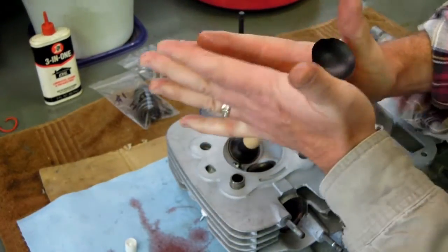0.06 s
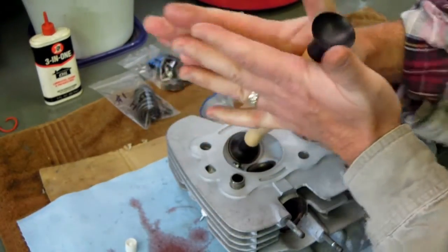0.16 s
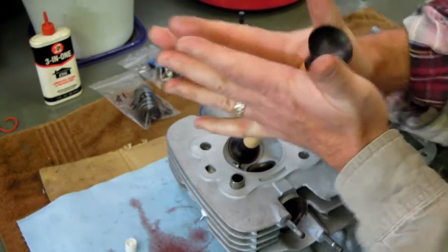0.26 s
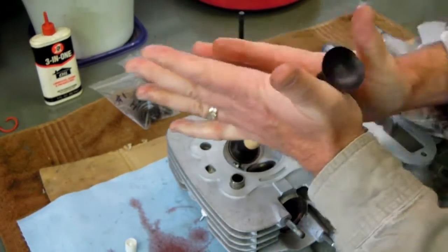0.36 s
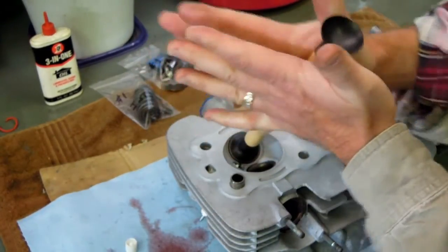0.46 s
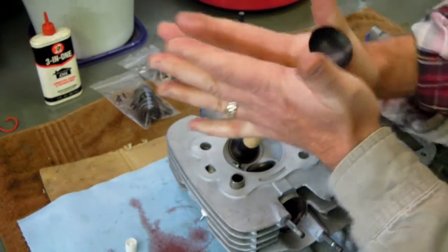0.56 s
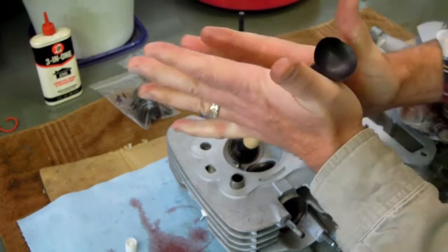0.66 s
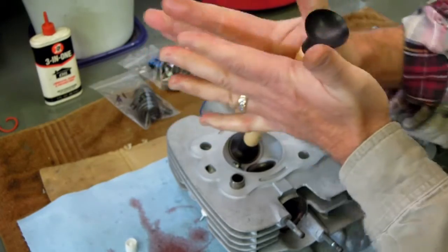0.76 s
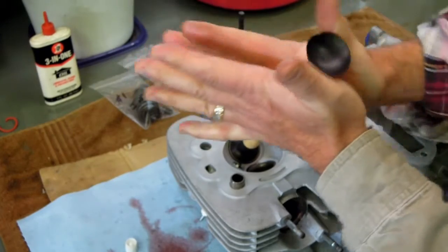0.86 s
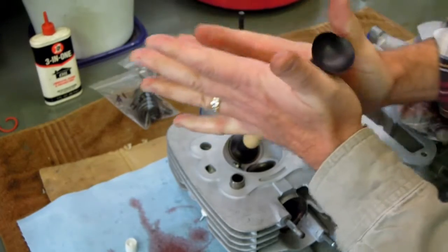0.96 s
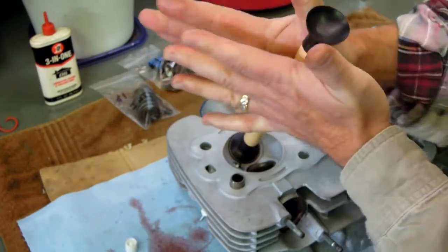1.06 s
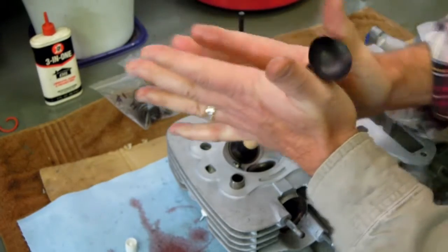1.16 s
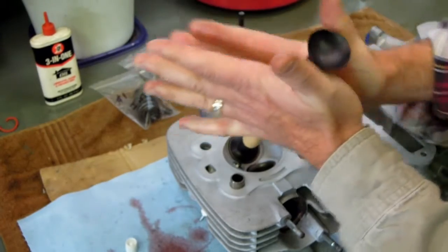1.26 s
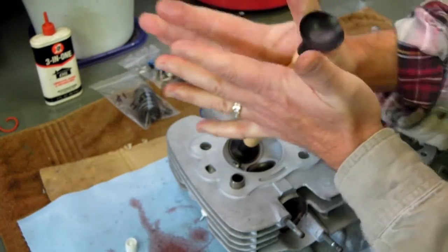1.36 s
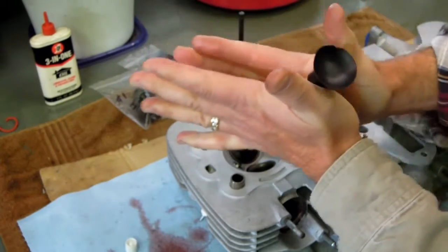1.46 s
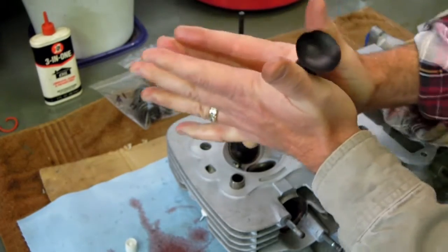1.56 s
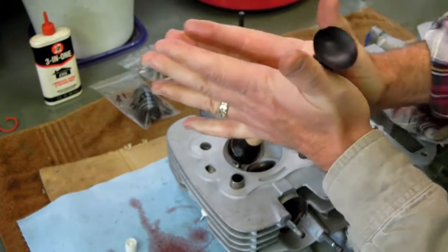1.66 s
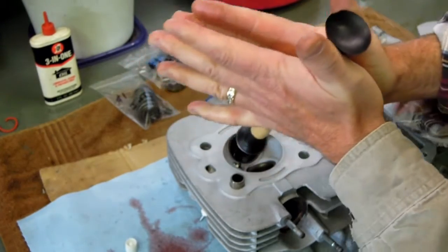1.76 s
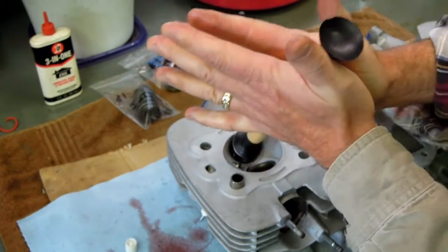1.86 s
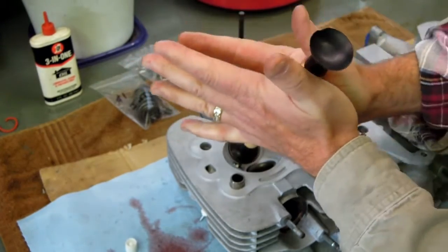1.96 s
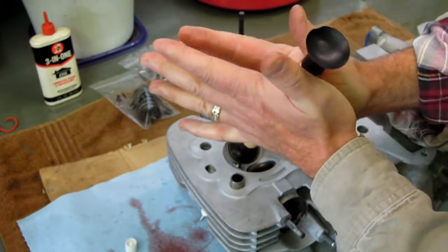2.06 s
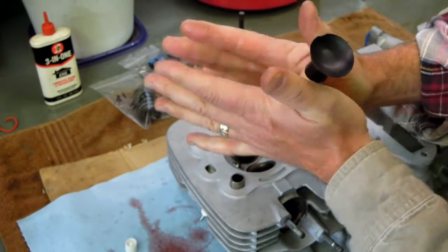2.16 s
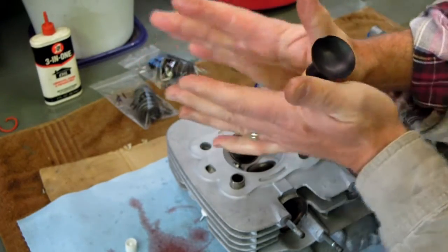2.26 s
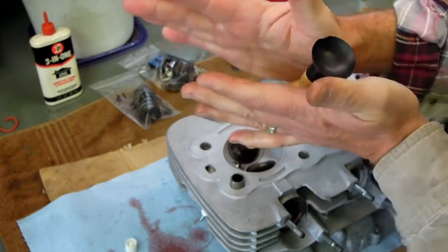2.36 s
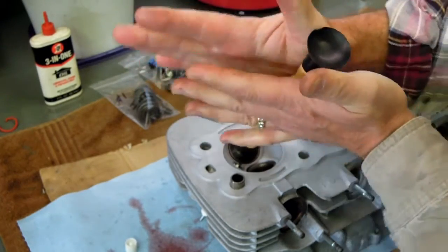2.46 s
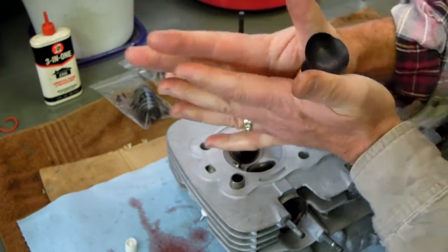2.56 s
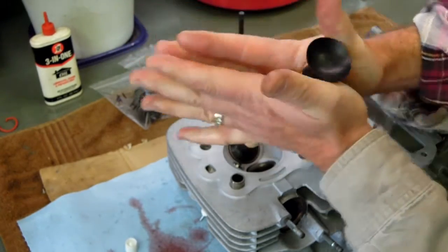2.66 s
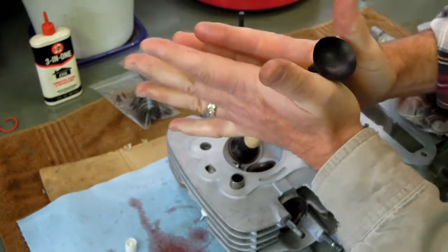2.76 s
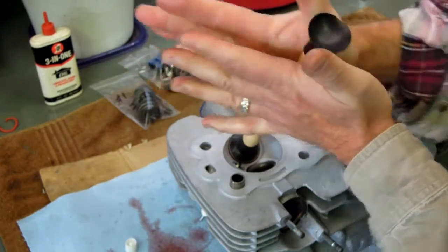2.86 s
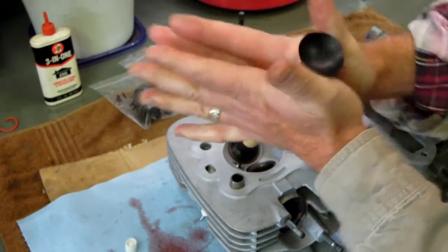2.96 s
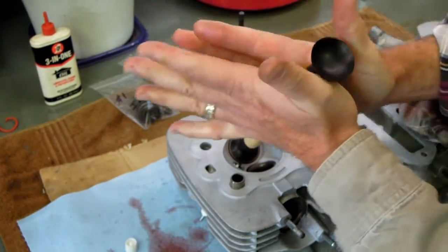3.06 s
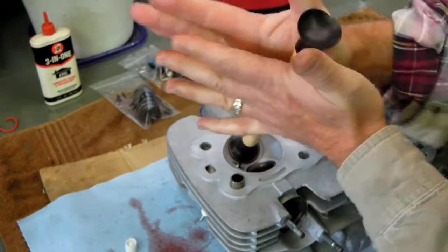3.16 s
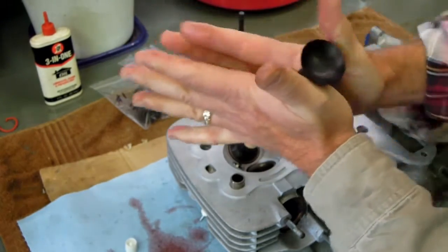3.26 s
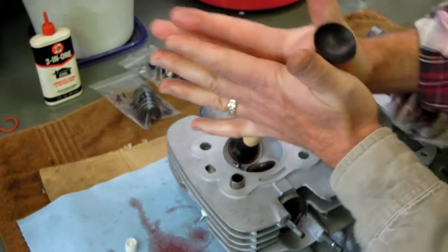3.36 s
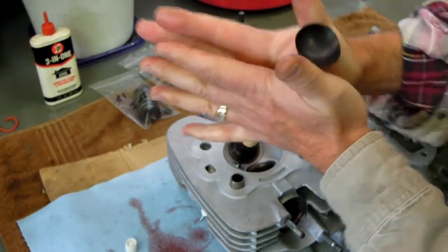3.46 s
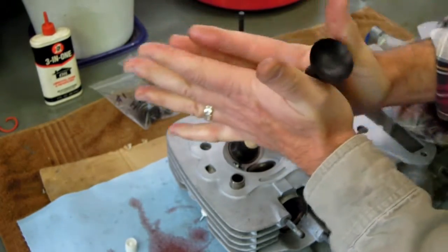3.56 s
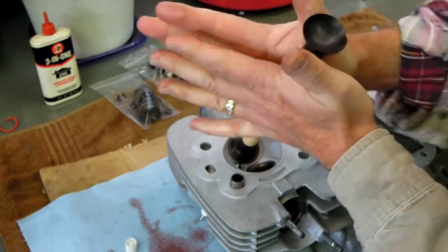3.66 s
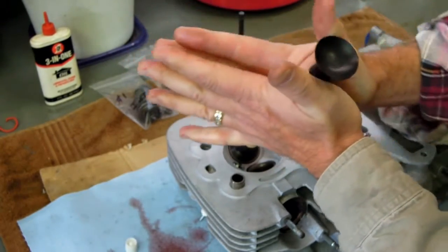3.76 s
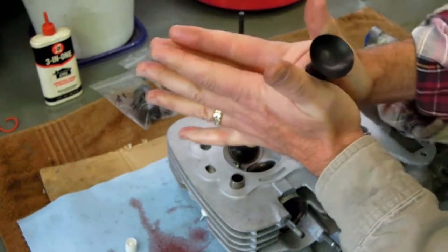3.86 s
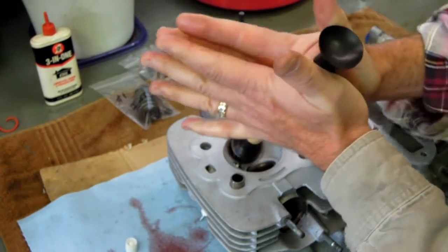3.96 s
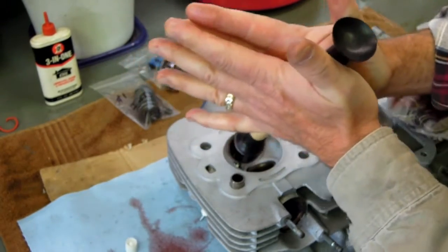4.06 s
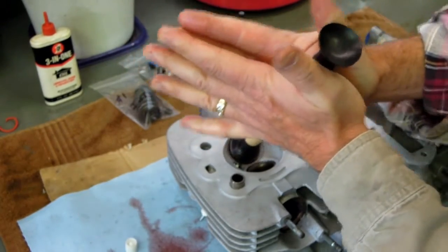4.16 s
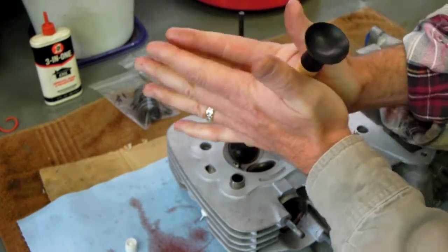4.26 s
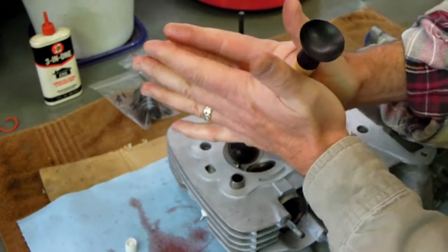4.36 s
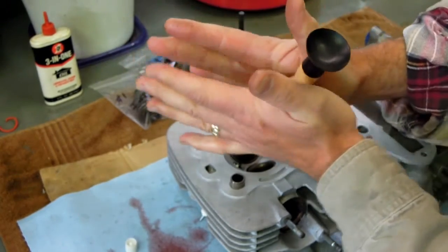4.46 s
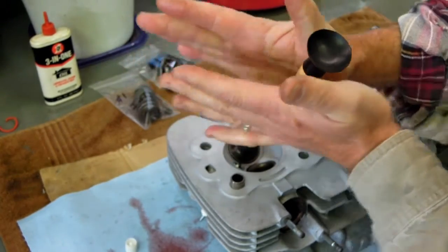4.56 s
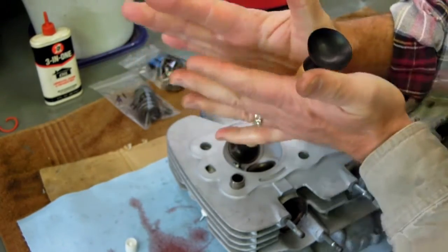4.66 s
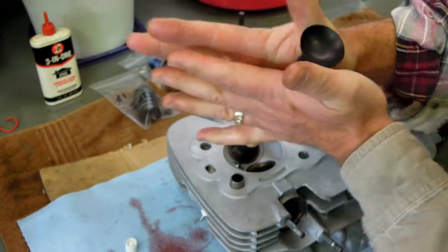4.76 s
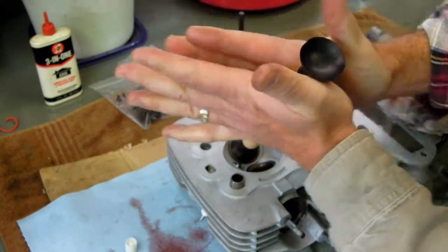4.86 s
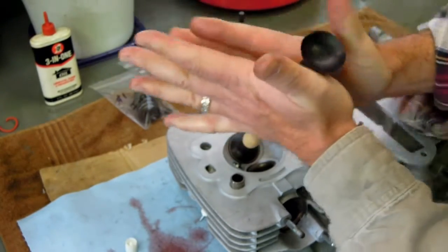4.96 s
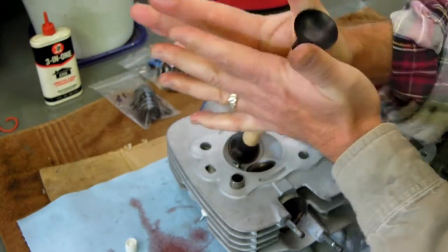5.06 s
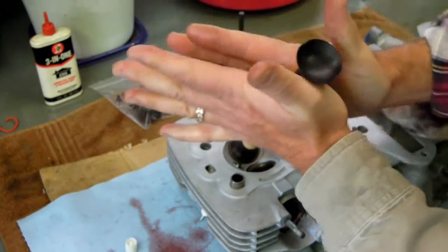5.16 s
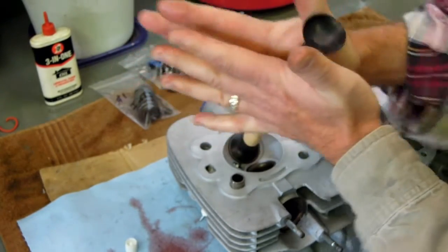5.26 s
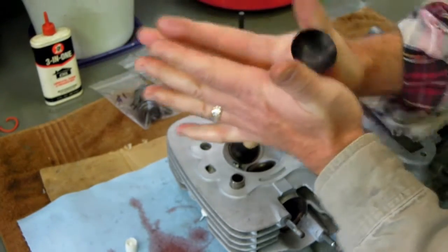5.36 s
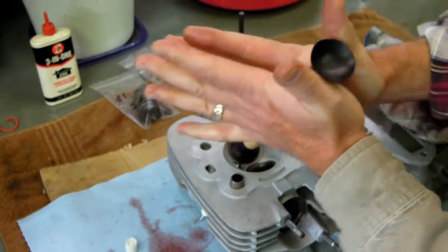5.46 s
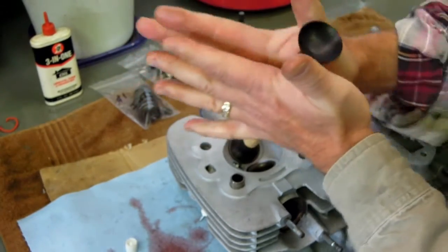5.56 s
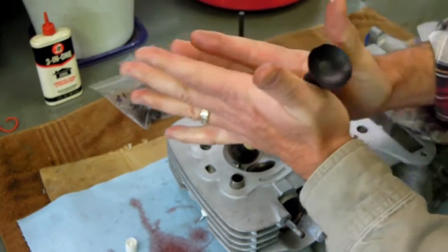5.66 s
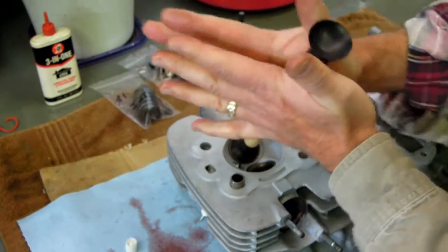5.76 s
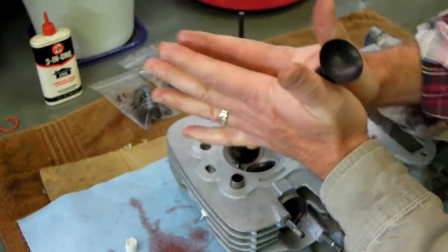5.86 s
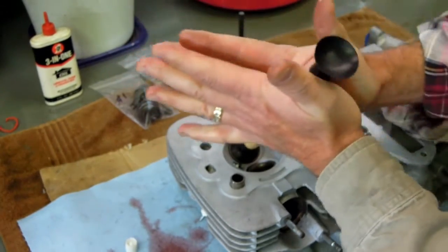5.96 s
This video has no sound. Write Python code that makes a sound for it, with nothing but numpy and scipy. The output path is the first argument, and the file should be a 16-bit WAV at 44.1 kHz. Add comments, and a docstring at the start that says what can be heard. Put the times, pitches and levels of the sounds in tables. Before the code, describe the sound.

Gritty abrasive paste crunches in quick back-and-forth strokes between metal parts, in three spells separated by dull metallic knocks, close up in a small workshop.

```python
"""Grinding paste crunches in short strokes over steady air: a valve is lapped by hand in an aluminium cylinder head.
Palms roll a suction stick to and fro; showers of random cracks follow the speed of the valve and ring the head.
Between spells the valve knocks on its seat and head and bench ring; a scrape of the stem precedes the first knock,
a tick follows the second. Each spell starts with fresh coarse grit.
Two closely spaced microphones hear it in a small workshop, whose echoes are a fading cloud of noise."""
import sys
import numpy as np
from scipy import signal
from scipy.fft import rfft, irfft
from scipy.io import wavfile
from scipy.ndimage import uniform_filter1d

SR = 44100
rng = np.random.default_rng(int(sys.argv[2]) if len(sys.argv) > 2 else 0)


def transcribe(signal):
    """Save signal, clipped to [-1, 1], as a 16-bit WAV file at the path in sys.argv[1]."""
    frames = np.atleast_2d(signal).T
    limited = np.clip(frames, -1, 1)
    pcm = np.round(limited * 32767).astype(np.int16)
    wavfile.write(sys.argv[1], SR, pcm)


N = 265190
TIME = np.arange(N) / SR

# Resonances of valve and head pressed together. Each row: centre in Hz, width in Hz, lift in dB.
CONTACT_PEAKS = [(648, 129, 11.5), (897, 35, 9.5), (975, 26, 12.0), (1949, 58, 8.0), (2219, 63, 6.5),
                 (2562, 26, 5.0), (3345, 32, 5.5), (4591, 30, 12.5), (4719, 34, 13.0), (5269, 54, 6.5),
                 (5538, 46, 8.5), (6204, 66, 9.5), (7253, 190, 5.0), (7550, 32, 3.5), (8120, 75, 9.0),
                 (8641, 23, 10.0), (8822, 66, 9.5), (9359, 133, 8.0), (10047, 66, 10.0), (10370, 224, 5.5),
                 (10807, 53, 9.5), (11884, 212, 9.5), (12279, 199, 14.5), (13522, 98, 5.5)]
# Landings of the valve on its seat. Each row: start in seconds, relative chatter level in dB,
# chatter decay in seconds, head ring level in dB, bench thud level in dB.
LANDINGS = [(2.0903, 2.5, 0.0028, -46, -17.5), (4.3613, 4.5, 0.0032, -33, -17)]
# Heavy head rocking on the bench top. Each row: frequency in Hz, relative level in dB, T60 in seconds.
ROCKING_MODES = [(92, -14, .19), (165, -22, .07), (350, -23, .12), (420, -5, .028), (470, -26, .2),
                 (640, -2.5, .03)]


def undb(db):
    """Decibels to gain."""
    return 10 ** (np.asarray(db) / 20)


def unit(x):
    """Scale to rms 1."""
    return x / np.sqrt(np.mean(x ** 2))


def colour(x, points, peaks=(), keep_power=True, size=4096):
    """Minimum-phase filter from (Hz, dB) points and (Hz, width Hz, lift dB) resonances."""
    f = np.arange(size // 2 + 1) * SR / size
    hz, db = np.transpose(points)
    curve_db = np.interp(np.log(f + 1), np.log(hz), db)
    for centre_hz, width_hz, lift_db in peaks:
        curve_db = curve_db + lift_db * .5 ** ((2 * (f - centre_hz) / width_hz) ** 2)
    gain = unit(undb(curve_db)) if keep_power else undb(curve_db)
    # folding the cepstrum makes the filter causal
    cepstrum = irfft(np.log(gain))
    cepstrum[1:size // 2] *= 2
    cepstrum[size // 2 + 1:] = 0
    impulse = irfft(np.exp(rfft(cepstrum)))[:size // 2]
    return signal.oaconvolve(x, impulse)[:N]


def walk(rate_hz):
    """Random levels drawn rate_hz times a second and slewed; rms 1."""
    hold = max(int(SR / rate_hz), 1)
    steps = rng.standard_normal(N)[np.arange(N) // hold]
    return unit(uniform_filter1d(steps, hold))


def fade(start_s, decay_s):
    """Sudden start, exponential fall by 1/e in decay_s."""
    return (TIME >= start_s) * np.exp(-np.clip((TIME - start_s) / decay_s, 0, 20))


def ring(start_s, hz, t60_s):
    """One struck mode: a sine that falls 60 dB in t60_s."""
    return fade(start_s, t60_s / np.log(1000)) * np.sin(2 * np.pi * hz * (TIME - start_s))


def struck(start_s, modes):
    """All modes of one body, set going together."""
    return sum(undb(db) * ring(start_s, hz, t60_s) for hz, db, t60_s in modes)


def grains(rate_hz, spread_db):
    """Cracks of single abrasive grains, a few much larger than the rest; rms 1."""
    chance = np.clip(rate_hz / SR, 1e-3, 1)
    size = undb(spread_db * np.minimum(rng.exponential(size=N), 4))
    cracks = (rng.random(N) < chance) * size * rng.choice([-1, 1], N)
    return unit(cracks / np.sqrt(chance))  # even power at any rate


def air():
    """Steady background: coloured noise in mid and, independently, in side."""
    # Each row: frequency in Hz, relative level in dB.
    air_colour = [(15, -5.5), (25, -1), (129, -6), (244, -10.5), (382, -9.5), (539, -12), (616, -9.5),
                  (722, -13.5), (1050, -14), (2500, -19), (2780, -12), (3010, -18), (4480, -20),
                  (14000, -24.5)]
    # Each row: frequency in Hz, side minus mid in dB.
    air_width = [(40, -12), (110, -5), (300, -1), (1500, -5.5), (8000, -0.5)]
    mid = colour(rng.standard_normal(N), air_colour)
    side = colour(rng.standard_normal(N), air_colour)
    side = colour(side, air_width, keep_power=False)
    return undb(-52) * np.array([mid, side])


def hands():
    """Relative valve speed, loudness, treble in dB and seconds since the spell began; turns speed up, hold, brake."""
    # One turn of the valve, until the next reversal. Each row: start in seconds, relative level in dB,
    # relative treble in dB.
    strokes = [(0.072, -30.5, -0.5), (0.242, -26.5, -.5), (0.385, -25, -0.6), (0.554, -23.5, 0),
               (0.689, -24.5, -0.8), (0.833, -23.5, -.5), (0.971, -24, -0.6), (1.117, -22.5, -.8),
               (1.253, -25, 0.4), (1.403, -26, 6), (1.528, -27, 4), (1.655, -35, 0.5), (2.663, -27, -2.4),
               (2.941, -22.5, -2.5), (3.079, -23, -2.1), (3.222, -22.5, -.5), (3.352, -23, -3),
               (3.482, -24.5, -1), (3.61, -26, 1.5), (3.746, -27.5, 5), (3.86, -29.5, 3),
               (4.92, -26.5, -3.5), (5.113, -22.5, 0), (5.25, -22, -2), (5.373, -21, -1),
               (5.491, -23.5, -.5), (5.622, -25.5, 1.2), (5.737, -23.5, -0.5), (5.86, -27, 3),
               (5.989, -21, -2)]
    # Spells of lapping. Each row: stop in seconds, time the palms take to get going in seconds.
    spells = [(1.764, .028), (3.957, .15), (6.11, 0.026)]
    speed_up_s, brake_s, roundness = .064, .067, .79
    # loudness grows with speed; the valve rocks at each reversal, so a share always stays
    rocking_share, sliding_share, speed_power = .21, .94, 1.215
    let_go_db, let_go_s = -44, .093

    speed, loud, treble_db, age_s = np.zeros((4, N))
    last_stop_s = 0
    for stop_s, get_going_s in spells:
        turns = [row for row in strokes if last_stop_s < row[0] < stop_s]
        starts_s = [row[0] for row in turns]
        ends_s = starts_s[1:] + [stop_s]
        rise_s = get_going_s
        for (start_s, db, bright_db), end_s in zip(turns, ends_s):
            now = (TIME >= start_s) & (TIME < end_s)
            t = TIME[now]
            ramp = np.minimum((t - start_s) / rise_s, (end_s - t) / brake_s)
            speed[now] = np.sin(np.pi / 2 * np.clip(ramp, 0, 1)) ** roundness
            loud[now] = undb(db) * (rocking_share + sliding_share * speed[now] ** speed_power)
            treble_db[now] = bright_db
            rise_s = speed_up_s
        age_s = np.where(TIME >= starts_s[0], TIME - starts_s[0], age_s)
        # last grains crunch as the palms let go
        loud += undb(let_go_db) * fade(stop_s, let_go_s)
        last_stop_s = stop_s
    loud = np.abs(uniform_filter1d(loud, size=220))  # 5 ms smoothing
    return speed, loud, treble_db, age_s


def grinding(speed, loud, treble_db, age_s):
    """Grit cracks faster and brighter with speed and excites the head; coarse grains are soon crushed."""
    # Radiation of the head. Each row: frequency in Hz, relative level in dB.
    head_colour = [(150, -39), (300, -30.5), (520, -34), (700, -18.5), (1000, -8), (1600, -10), (2100, 0.5),
                   (2600, -2.5), (3100, -9), (4200, -11.5), (6000, -9.5), (8200, -5), (11300, -11),
                   (14000, -13.5)]
    # Low crunch of coarse grit. Each row: frequency in Hz, relative level in dB.
    coarse_colour = [(100, -18.5), (230, -5), (450, -1.5), (700, 4.5), (1400, 3.5), (2500, -10),
                     (6000, -38)]
    # Bands whose answer varies as the contact wanders round the seat.
    # Each row: centre in Hz, width in Hz, rms spread in dB.
    wander = [(950, 700, 1.8), (2600, 500, 2.3), (5000, 2500, 1)]
    crossover_hz = 3400

    bite = loud * undb(0.5 * walk(110) + 0.69 * walk(35))
    cracks = grains(3000 + 14000 * speed, spread_db=2.0)
    grit = colour(cracks * bite, head_colour, CONTACT_PEAKS)
    for hz, width_hz, spread_db in wander:
        band = signal.lfilter(*signal.iirpeak(hz, hz / width_hz, fs=SR), grit)
        grit = grit + (undb(spread_db * walk(17)) - 1) * band

    body = signal.sosfilt(signal.butter(2, crossover_hz, fs=SR, output="sos"), grit)
    edge = signal.sosfilt(signal.butter(2, crossover_hz, "high", fs=SR, output="sos"), grit)
    edge_db = 1.5 + treble_db + 6.56 * (speed - 1.18)
    # opposite sign keeps the two bands in phase at the crossover
    fine = undb(-0.5) * body - undb(edge_db) * edge

    fresh = 0.12 + np.exp(-age_s / 0.28)
    crunch = grains(900 + 1500 * speed, spread_db=2.5) * bite ** 0.66 * fresh
    return fine + undb(-18.5) * colour(crunch, coarse_colour)


def singing(grit, head):
    """Grinding stirs the modes of the head, which ring on faintly when the hands stop."""
    rung = unit(signal.oaconvolve(grit, head[:SR])[:N])
    return undb(-18) * np.std(grit) * rung


def reverb(x):
    """Workshop walls: a dense, exponentially fading cloud of noise echoes."""
    t60_s, level_db, delay_s = .62, -14.5, .0082
    echoes = (rng.standard_normal(N) * fade(delay_s, t60_s / np.log(1000)))[:SR]
    echoes = echoes / np.linalg.norm(echoes)
    return undb(level_db) * signal.oaconvolve(x, echoes)[:N]


def handling():
    """The stem scrapes or ticks on grains in its guide; grip changes jog only the first mode of the bench."""
    # Hands jogging the bench. Each row: start in seconds, level in dB.
    jog_rows = [(1.897, -44), (1.935, -42), (2.022, -42), (4.21, -42.5), (4.326, -43)]
    # Stem in its guide: a scrape in two parts, later a tick.
    # Each row: start in seconds, level in dB, decay in seconds.
    slide_rows = [(1.926, -34.5, 0.032), (1.981, -42.5, 0.02), (4.654, -42, 0.0027)]
    # Each row: frequency in Hz, relative level in dB.
    slide_colour = [(290, -20), (500, -1), (670, -20), (739, -11), (1500, -10), (1990, -3), (2820, -15),
                    (4460, -5), (9480, -4.5), (14000, -12.5)]
    hz, _, t60_s = ROCKING_MODES[0]
    jogs = sum(undb(db) * ring(start_s, hz, t60_s) for start_s, db in jog_rows)
    slide = sum(undb(db) * fade(start_s, decay_s) for start_s, db, decay_s in slide_rows)
    stem = colour(slide * grains(6000, spread_db=2.5), slide_colour, CONTACT_PEAKS)
    return stem + jogs


def chatter():
    """The valve rattles to rest in a noise burst and sets the cooling fins shimmering."""
    # Each row: frequency in Hz, relative level in dB.
    knock_colour = [(60, -24), (150, -4.5), (250, -22.5), (420, -2), (650, -7), (950, -7.5), (1150, -4.5),
                    (1600, -22), (1950, -1), (2500, -6), (5000, -12), (11900, -18), (14000, -25)]
    # Dense shimmer of the fins. Each row: frequency in Hz, relative level in dB.
    fin_colour = [(60, -5), (260, -21), (360, -7), (650, 0), (820, -10.5), (1500, -9), (2100, -1.5),
                  (2600, -15), (5500, -15.5), (8000, -21.5), (14000, -28)]
    contact, shimmer = np.zeros((2, N))
    for start_s, db, chatter_s, _, _ in LANDINGS:
        burst = fade(start_s, chatter_s) - 0.73 * fade(start_s, chatter_s / 3)  # softened onset
        burst = burst + 0.22 * fade(start_s, 0.023)
        contact += undb(db - 14.5) * burst
        shimmer += undb(db - 39.0) * fade(start_s, 0.091)
    rattle = colour(contact * rng.standard_normal(N), knock_colour, CONTACT_PEAKS)
    return rattle + colour(shimmer * rng.standard_normal(N), fin_colour)


def knocks(head):
    """Each landing strikes the modes of head and bench: the head rings on, the bench thuds."""
    out = np.zeros(N)
    for start_s, _, _, ring_db, thud_db in LANDINGS:
        out += undb(thud_db) * struck(start_s, ROCKING_MODES)
        out += undb(ring_db) * np.pad(head, (int(start_s * SR), 0))[:N]
    return out


def scene():
    """Work close by, built as mid and side, with workshop echoes and steady air."""
    # Modes of the head, struck or rubbed. Each row: frequency in Hz, relative level in dB, T60 in seconds.
    head_modes = [(614, -8, .4), (678, -9, .4), (900, -12, .55), (1130, -15, .5), (1446, -16, .4),
                  (1922, -8, .45), (1955, -11, .35), (2088, -9, .4), (2164, -6, .48), (2799, -9, .5),
                  (3090, -11, .55), (3155, -8, .39), (3639, -14, .3), (4587, -10, .4), (5165, -14, .5),
                  (6065, -17, .4)]
    # Each row: frequency in Hz, level in dB.
    room_colour = [(100, -4), (600, 0), (2200, 0), (5000, 0), (9000, -6), (14000, -10)]
    # Difference between the two microphones. Each row: frequency in Hz, level in dB.
    port_side = [(100, -24), (1300, -29), (3500, -29), (4600, -16), (6000, -13), (8000, -8.5),
                 (14000, -6.5)]
    room_side_db = -16

    motion = hands()
    head = struck(0, head_modes)
    grit = grinding(*motion)
    front = grit + singing(grit, head) + handling() + chatter() + knocks(head)
    # each face of the head radiates its own mix of grains
    flank = grinding(*motion) + handling() + chatter()

    to_room = colour(front, room_colour, keep_power=False)
    air_mid, air_side = air()
    mid = front + reverb(to_room) + air_mid
    side = colour(flank, port_side, keep_power=False)  # mostly treble
    side = side + undb(room_side_db) * reverb(to_room) + air_side
    return np.array([mid + side, mid - side])


def record(dry):
    """The camera cuts the top steeply above 14.2 kHz with an elliptic low-pass."""
    return signal.sosfilt(signal.ellip(12, .1, 80, 14200, fs=SR, output="sos"), dry)


dry = scene()
out = record(dry)
transcribe(out)
```